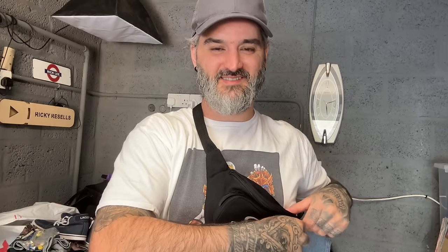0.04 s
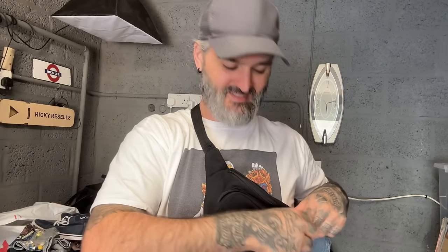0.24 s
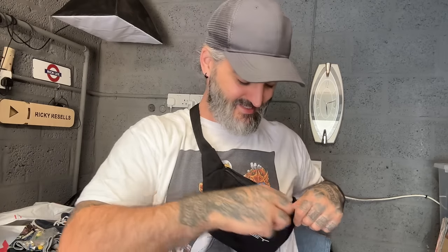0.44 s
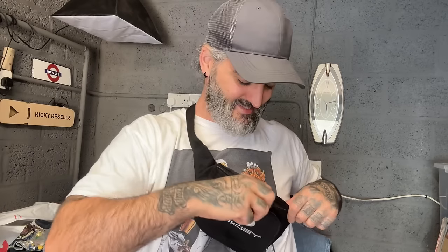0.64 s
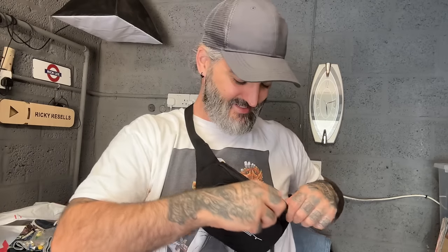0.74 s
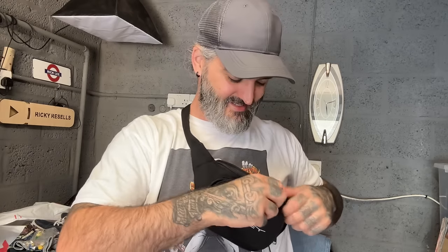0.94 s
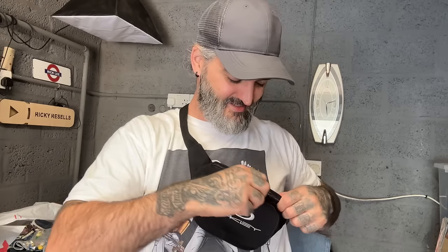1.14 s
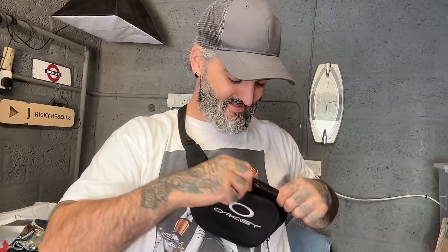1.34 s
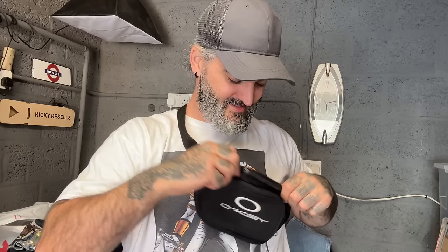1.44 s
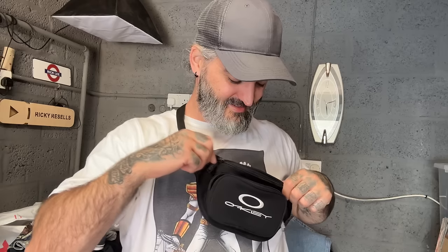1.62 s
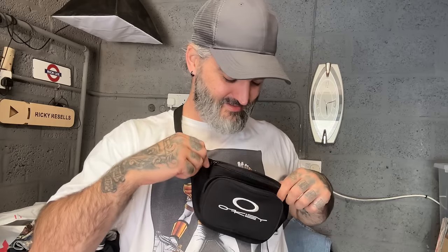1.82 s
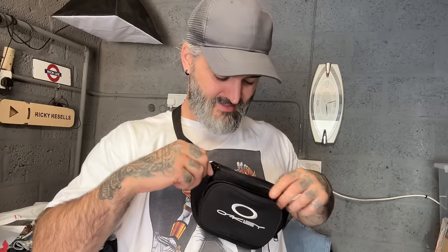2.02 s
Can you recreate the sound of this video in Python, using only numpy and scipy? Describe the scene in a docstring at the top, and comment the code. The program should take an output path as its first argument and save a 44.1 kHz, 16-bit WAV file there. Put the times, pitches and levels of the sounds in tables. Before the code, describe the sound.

A zip on a small fabric bag is pulled twice: a short rasp, then a longer one.

```python
"""Zip on a padded bag

The zip of a small fabric bag is pulled twice by hand in a small room: a short rasp, then a longer one.
The slider snaps over the teeth, singly when slow, in a buzz when fast; each snap drums the panel.
The slider scrapes the tape, its metal tab chinks, and the cloth rustles as the hands shift grip."""
import sys
import numpy as np
from scipy import signal
from scipy.fft import rfft, irfft
from scipy.io import wavfile
from scipy.ndimage import uniform_filter1d

SR = 44100
rng = np.random.default_rng(int(sys.argv[2]) if len(sys.argv) > 2 else 0)


def wrap_up_sound(samples):
    """Save the sound to the file named by the first command line argument, as 16-bit audio."""
    columns = np.atleast_2d(samples).T
    # keep every value between -1 and 1, then stretch to whole-number steps
    tamed = np.clip(columns, -1, 1)
    steps = np.round(tamed * 32767).astype(np.int16)
    wavfile.write(sys.argv[1], SR, steps)


N = 91463
T = np.arange(N) / SR


def amp(db):
    """Decibels to gain."""
    return 10 ** (np.asarray(db) / 20)


def unit(x):
    """Scale to rms 1."""
    return x / np.sqrt(np.mean(x ** 2) + 1e-20)


def at_hz(points, hz):
    """Interpolate on a log-frequency axis."""
    knots_hz, values = np.transpose(points)
    return np.interp(np.log(hz + 1), np.log(knots_hz), values)


def envelope(points):
    """Gain over time from a dB curve, silent outside it."""
    return amp(np.interp(T, *np.transpose(points), left=-150, right=-150))


def colour(x, *spectra):
    """Minimum-phase filter of unit energy from summed dB spectra."""
    size = 4096
    hz = abs(np.fft.fftfreq(size, 1 / SR))
    log_gain = np.log(amp(sum(at_hz(s, hz) for s in spectra)))
    taps = np.fft.ifft(np.exp(np.conj(signal.hilbert(log_gain)))).real[:size // 2]
    return signal.oaconvolve(x, taps / np.linalg.norm(taps))[:N]


def clicks(start_s, level_db, span_s=0.0068):
    """Impulses, each with rms level_db over span_s."""
    sizes = amp(level_db) * np.sqrt(span_s * SR)
    return np.bincount(np.round(np.asarray(start_s) * SR).astype(int), sizes, N)[:N]


def grit(train, decay_s=0.0024):
    """Spread each impulse into a noise puff of equal energy."""
    pole = np.exp(-2 / (decay_s * SR))
    power = signal.lfilter([1 - pole], [1, -pole], train ** 2)
    return np.sqrt(power + 1e-30) * rng.standard_normal(N)


def roughen(train, amount, decay_s=0.0024):
    """Blend impulses with their grit at constant energy."""
    return (train + amount * grit(train, decay_s)) / np.hypot(1, amount)


def grainy(depth_db, grain_s):
    """Noise whose level varies from grain to grain."""
    knots = rng.standard_normal(N)
    grain_db = depth_db * np.interp(T / grain_s, np.arange(N), knots)
    return unit(rng.standard_normal(N) * amp(grain_db))


def resonance(x, pitch_hz, width_hz):
    """Two resonators in series that follow pitch_hz and keep each snap's energy."""
    carrier = np.exp(2j * np.pi * np.cumsum(pitch_hz) / SR)
    pole = np.exp(-np.pi * width_hz / SR)
    for _ in range(2):
        x = 2 * (carrier * signal.lfilter([1 - pole], [1, -pole], x / carrier)).real
    return x * np.sqrt(2 * SR / (np.pi * width_hz))


def strike(x, modes, pitch_ratio=1):
    """Impulses ring decaying metal modes."""
    t = T[:SR // 4]
    tone = sum(amp(db - 60 * t / t60_s) * np.sin(2 * np.pi * hz * pitch_ratio * t)
               for hz, db, t60_s in modes)
    return signal.oaconvolve(x, tone / np.linalg.norm(tone))[:N]


# room rumble: freq_hz, density_db
RUMBLE_SPECTRUM = [(38, -33), (64, 6.5), (100, -10), (200, -11.5), (600, -20.5), (1500, -23.5),
                   (16000, -50)]


def rumble(level_db=-72, spread=0.4):
    """Low steady room noise, nearly alike in both channels."""
    mid, side = (colour(noise, RUMBLE_SPECTRUM) for noise in rng.standard_normal((2, N)))
    return amp(level_db) * np.array([mid + spread * side, mid - spread * side])


# room decay: freq_hz, t60_s
ROOM_DECAY = [(100, 0.73), (500, 0.12), (3000, 0.28), (9000, 0.15)]


def walls(early_s=0.0086, early_db=-4, tail_db=-12):
    """Stereo response of near reflections and a short tail."""
    noise = rng.standard_normal((2, SR // 2))
    hz, frame_s, frames = signal.stft(noise, SR, nperseg=256)
    decay = amp(-60 * frame_s / at_hz(ROOM_DECAY, hz)[:, None])
    t = T[:SR // 2]
    tail = signal.istft(frames * decay, SR, nperseg=256)[1][:, :len(t)] * (t > 0.008)
    early = noise * np.exp(-t / early_s) * (t > 0.002)
    return (amp(tail_db) * unit(tail) + amp(early_db) * unit(early)) / np.sqrt(len(t))


# direct-path phase: freq_hz, left_lead_rad
DIRECT_PHASE = [(100, -1.5), (600, 0), (2400, -2.17), (6900, -2), (12000, -4)]


def room(x, responses=5, crossfade_s=0.03):
    """Direct sound arrives right first; crossfaded responses keep the room free of fixed ringing."""
    hz = np.fft.rfftfreq(2 * N, 1 / SR)
    left = irfft(rfft(x, 2 * N) * np.exp(1j * at_hz(DIRECT_PHASE, hz)))[:N]
    out = np.array([left, x])
    for k in range(responses):
        place = (T / crossfade_s + k) % responses
        fade = np.sin(np.pi * place / 2) * (place < 2)
        out = out + signal.fftconvolve((x * fade)[None], walls(), axes=1)[:, :N]
    return out


# cloth handling: time_s, level_db
CLOTH_LEVEL = [(0, -65.5), (.075, -60), (.12, -69.5), (.62, -69.5), (.65, -78), (.69, -66.5), (.755, -70.5),
               (.77, -60), (.8, -65.5), (.84, -61.5), (.935, -81.5), (.96, -59), (1.055, -65), (1.2, -88),
               (1.775, -65), (1.81, -100), (1.905, -76.5), (1.94, -62.5), (1.985, -61), (2.02, -90)]
# rustle: freq_hz, density_db
CLOTH_SPECTRUM = [(40, -16), (150, -12), (350, -11.5), (560, -1.5), (820, -6), (1200, -8.5), (2200, -14.5),
                  (15500, -25)]


def cloth():
    """Fingers shift and crumple the fabric."""
    return colour(grainy(depth_db=3, grain_s=0.00093) * envelope(CLOTH_LEVEL), CLOTH_SPECTRUM)


# tape friction, per pull: time_s, level_db
SCRAPE_LEVELS = [
    [(.25, -82), (.345, -54.5), (.395, -51), (.41, -59), (.435, -68), (.462, -56), (.483, -62.5),
     (.53, -82)],
    [(.94, -106), (1.0, -76.5), (1.15, -62.5), (1.2, -67.5), (1.225, -58.5), (1.42, -45.5), (1.5, -48),
     (1.575, -53), (1.665, -50), (1.7, -71)],
]
# tape friction: freq_hz, density_db
SCRAPE_SPECTRUM = [(200, -71), (1000, 6), (4200, -0.5), (5600, -6.5), (9500, -5), (15500, -10)]
# dull heave of the bag: freq_hz, density_db
HEAVE_SPECTRUM = [(25, -18), (70, -1.5), (150, -12.5), (1000, -66)]


def scrape(heave_db=-65):
    """The slider rubs the tape and tugs at the whole bag."""
    rub = sum(envelope(curve) for curve in SCRAPE_LEVELS)
    moving = uniform_filter1d((rub > amp(-75)) * 1.0, 2000)
    friction = colour(grainy(depth_db=5.5, grain_s=0.0019) * rub, SCRAPE_SPECTRUM)
    heave = colour(rng.standard_normal(N) * moving, HEAVE_SPECTRUM)
    return friction + amp(heave_db) * heave


# tab hits: start_s, level_db, ring_offset_db
CHINKS = [(0.058, -57.5, 5.5), (0.082, -55, 0), (.403, -46.5, -15), (.7585, -56, -6), (1.046, -44.5, -9),
          (1.533, -41.5, -9), (1.603, -53.5, 14), (1.614, -49.5, 15.5), (1.6442, -43.5, 6.5)]
# crack of a hit: freq_hz, density_db
CHINK_SPECTRUM = [(200, -9), (3000, -6.5), (5000, -1), (8000, -6.5), (11000, 5), (16000, -7.5)]
# tab chatter, per shake: time_s, level_db
CHATTER_LEVELS = [
    [(0, -63), (.028, -55), (.07, -75), (.105, -60.5)],
    [(1.53, -55), (1.57, -49), (1.595, -46), (1.655, -66), (1.675, -55)],
]
# light contacts favour high modes: freq_hz, gain_db
CHATTER_TILT = [(5000, -5), (11000, 9)]
# tab modes: pitch_hz, level_db, t60_s
TAB_MODES = [(4852, 11, 0.019), (4960, 1, .032), (11080, -2.5, 0.045), (11090, -6, 0.023)]


def tab(contacts_per_s=1100, loose_until_s=0.2, loose_ratio=1.018):
    """The metal tab chatters and knocks on the slider, ringing higher while it hangs loose."""
    start_s, level_db, ring_offset_db = np.transpose(CHINKS)
    contacts = unit(rng.standard_normal(N) * (rng.random(N) < contacts_per_s / SR))
    chatter = contacts * sum(envelope(curve) for curve in CHATTER_LEVELS)
    blows = amp(-6) * clicks(start_s, level_db + ring_offset_db) + colour(chatter, CHATTER_TILT)
    loose = T < loose_until_s
    rings = strike(blows * loose, TAB_MODES, loose_ratio) + strike(blows * ~loose, TAB_MODES)
    cracks = grit(clicks(start_s, level_db), decay_s=0.0012)
    return colour(cracks, CHINK_SPECTRUM) + rings


# slider modes: pitch_hz, level_db, t60_s
SLIDER_MODES = [(5280, -1.5, 0.013), (8150, -11.5, 0.016), (11300, -6.5, 0.011), (15500, -16, .022)]


def end_stop():
    """The slider clinks against the end of the zip."""
    return strike(clicks(start_s=[1.6447], level_db=[-41]), SLIDER_MODES)


# jams after the first pull: start_s, level_db
KNOCKS = [(0.495, -42.5), (0.576, -44.5)]
# hollow ring of a knock: freq_hz, density_db
KNOCK_SPECTRUM = [(350, -20.5), (620, 10), (850, -6), (1150, 3), (2000, -4.5), (2750, 1.5), (6000, -15),
                  (16000, -28)]


def knocks():
    """The jammed slider knocks and rattles against the stiff seam."""
    blows = clicks(*np.transpose(KNOCKS))
    return colour(roughen(blows, amount=1, decay_s=0.0067), KNOCK_SPECTRUM)


# taut panel: freq_hz, density_db
PANEL_SPECTRUM = [(50, -56.5), (140, -3), (240, 0), (520, 0.5), (780, 3), (1000, -7), (1200, -12),
                  (1700, -6.5), (2250, -13.5), (3500, -25), (6000, -30.5), (16000, -97)]
# added colour when slack: freq_hz, gain_db
SLACK_COLOUR = [(130, 9), (330, 4), (460, -2.5), (700, -.5), (1100, 8.5), (1600, 3), (2800, 10.5),
                (6000, 12.5)]


def panel_body(fast, slow, slack, dispersion_hz=800, pole=0.855):
    """Broadband panel response; bending waves disperse and round each snap."""
    drive = roughen(fast, 0.6) + roughen(slow, 0.33)
    body = colour(drive * slack, PANEL_SPECTRUM, SLACK_COLOUR) + colour(drive * ~slack, PANEL_SPECTRUM)
    allpass = [1, -2 * pole * np.cos(2 * np.pi * dispersion_hz / SR), pole * pole]
    return amp(-4.5) * signal.lfilter(allpass[::-1], allpass, body)


# main panel mode, set by tension and slider position: time_s, pitch_hz
PANEL_PITCH = [(.25, 730), (.38, 830), (.42, 624), (.77, 760), (1.2, 670), (1.35, 727), (1.405, 560),
               (1.44, 810), (1.472, 720), (1.5, 489), (1.56, 490), (1.615, 728)]
# snap brightness: time_s, bright_db
BRIGHTNESS = [(.25, -2.5), (.38, 0.5), (1.07, -6.5), (1.11, 2), (1.232, -3.5), (1.25, 6.5), (1.32, 8),
              (1.345, 0), (1.385, -3.5), (1.42, 9), (1.51, -10.5), (1.63, -4)]


def panel_modes(fast, slow, slack, slack_db=-3.5, upper_hz=1444):
    """The upper mode gains as the main one gives way; a slack panel rings less."""
    pitch_hz = np.interp(T, *np.transpose(PANEL_PITCH))
    bright_db = np.interp(T, *np.transpose(BRIGHTNESS))
    snaps = fast * amp(slack_db * slack) + slow
    snaps = snaps + 0.5 * grit(snaps)
    main = resonance(snaps * amp(-4.5 - bright_db / 2), pitch_hz, width_hz=311)
    upper = resonance((fast + slow) * amp(-10.5 + bright_db), np.full(N, upper_hz), width_hz=720)
    return upper - main


# slider speed, per pull: time_s, teeth_per_s
PULL_SPEEDS = [
    [(.262, 113.5), (.31, 193.5), (.35, 228), (.378, 276), (.40, 192), (.416, 102)],
    [(1.335, 131), (1.36, 195), (1.425, 328), (1.445, 394), (1.472, 336), (1.497, 229), (1.512, 238),
     (1.525, 280), (1.56, 184), (1.585, 125.6), (1.61, 258), (1.624, 249)],
]
# pull force, per pull: time_s, level_db
PULL_FORCES = [
    [(.262, -51), (.31, -46), (.368, -38.5), (.381, -39), (.397, -49), (.406, -35.5), (.416, -61)],
    [(1.335, -46), (1.41, -42), (1.432, -44.5), (1.447, -39), (1.508, -37), (1.523, -37), (1.54, -46),
     (1.578, -46.5), (1.616, -39.5), (1.624, -45)],
]


def fast_run(speed, force, jitter_s=0.00028, jitter_ref_per_s=200, uneven_db=2):
    """One snap per tooth passed; faster runs are steadier."""
    teeth_per_s = np.interp(T, *np.transpose(speed), left=0, right=0)
    teeth_passed = np.ceil(np.cumsum(teeth_per_s) / SR)
    hits = np.flatnonzero(np.diff(teeth_passed)) + 1
    late, strong = np.clip(rng.standard_normal((400, 2))[:len(hits)].T, -1.5, 1.5)
    start_s = T[hits] + jitter_s * late * (jitter_ref_per_s / teeth_per_s[hits]) ** 2
    level_db = np.interp(T[hits], *np.transpose(force)) + uneven_db * strong
    return clicks(start_s, level_db, span_s=1 / teeth_per_s[hits])


# a light opening tap on the cloth, then single teeth as the slider creeps:
# start_s, level_db, tick_offset_db
SINGLE_HITS = [(0.063, -56.5, -0.5), (0.2508, -47, -26), (0.3091, -46.5, -34), (0.4207, -45.5, -9),
               (0.4415, -40, -10), (.459, -39, -9.5), (0.762, -57.5, -15), (.773, -55, -7),
               (.829, -60.5, -6), (.9565, -58, -18), (1.0105, -54, -17), (1.038, -52.5, -22),
               (1.073, -50, -3), (1.091, -51, -2), (1.108, -47, -2.5), (1.129, -45.5, -6.5),
               (1.1474, -48, -1.5), (1.1719, -44.5, -8), (1.2122, -46.5, -0.5), (1.221, -45.5, -15),
               (1.232, -56, 8), (1.248, -45.5, -1), (1.2569, -47.5, -4), (1.2656, -48, -6),
               (1.279, -50, -7), (1.291, -45.5, -17), (1.304, -47.5, -5.5), (1.3272, -44, -2.5),
               (1.6265, -41, -7), (1.64, -40, -19), (1.652, -40, -31), (1.669, -49, -2)]
# tick in the slider: freq_hz, density_db
TICK_SPECTRUM = [(300, -29), (1500, 3.5), (4000, 2.5), (11000, -4.5), (16000, 0.5)]


def teeth(rebound_s=0.0035, rebound_db=-7.5, slack_until_s=0.5, crisp_db=3):
    """Each tooth ticks in the slider and drums the panel; a slow one seats with a softer second push."""
    start_s, level_db, tick_offset_db = np.transpose(SINGLE_HITS)
    fast = sum(fast_run(speed, force) for speed, force in zip(PULL_SPEEDS, PULL_FORCES))
    delay_s = rebound_s * rng.uniform(0.756, 1.251, len(start_s))
    rebounds = clicks(start_s + delay_s, level_db + rebound_db)
    slow = (clicks(start_s, level_db) + rebounds) / np.hypot(1, amp(rebound_db))
    slack = T < slack_until_s
    panel = panel_body(fast, slow, slack) + panel_modes(fast, slow, slack)
    ticks = amp(-12) * fast + clicks(start_s, level_db + tick_offset_db + crisp_db)
    ticks = 0.39 * ticks + grit(ticks, decay_s=0.0007)
    return panel + amp(-5.5) * colour(ticks, TICK_SPECTRUM)


def scene():
    """Zip and cloth in the room, over its rumble."""
    bag = teeth() + knocks() + scrape() + tab() + end_stop() + cloth()
    return amp(-1.14) * room(bag) + rumble()


# channel balance: freq_hz, left_minus_right_db
MIC_BALANCE = [(150, 1.5), (350, -4), (700, -6), (1400, -0.5), (3000, -2.5), (8000, 3)]
# stereo width: freq_hz, side_db
MIC_WIDTH = [(100, -5), (4000, -1), (9000, 3), (12000, -17)]


def record(dry, cutoff_hz=16050):
    """The band-limited microphone pair leans right in the mids and narrows in the high treble."""
    hz = np.fft.rfftfreq(2 * N, 1 / SR)
    lean = amp(at_hz(MIC_BALANCE, hz) / 2)
    left, right = rfft(dry, 2 * N) * np.array([lean, 1 / lean])
    mid = (left + right) / 2
    side = (left - right) / 2 * amp(at_hz(MIC_WIDTH, hz))
    stereo = irfft(np.array([mid + side, mid - side]))[:, :N]
    lowpass = signal.firwin(401, cutoff_hz, window=("kaiser", 8), fs=SR)
    return signal.oaconvolve(stereo, lowpass[None], "same")


dry = scene()
out = record(dry)
wrap_up_sound(out)
```